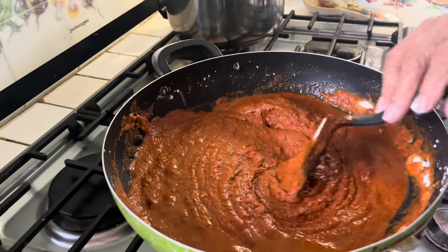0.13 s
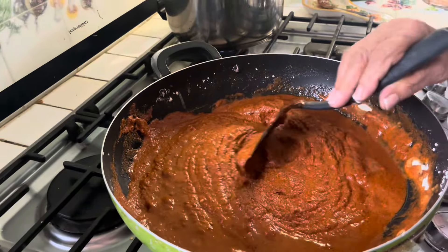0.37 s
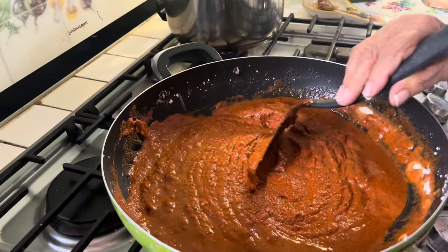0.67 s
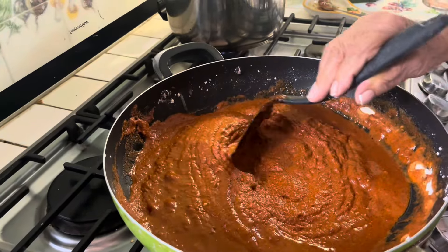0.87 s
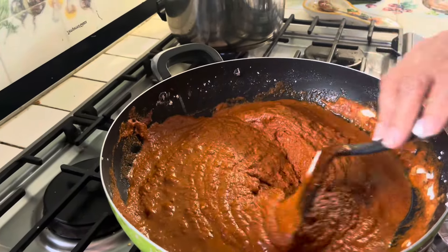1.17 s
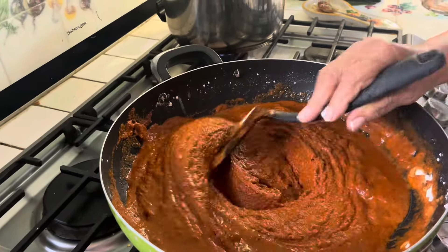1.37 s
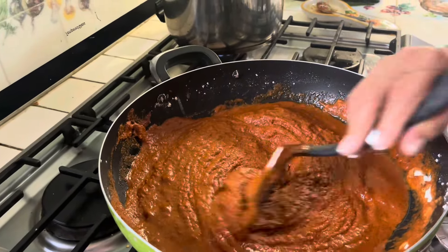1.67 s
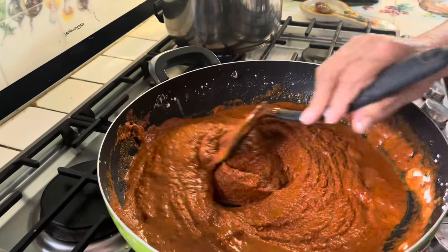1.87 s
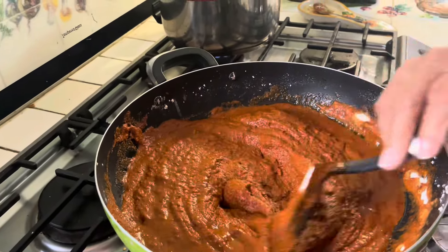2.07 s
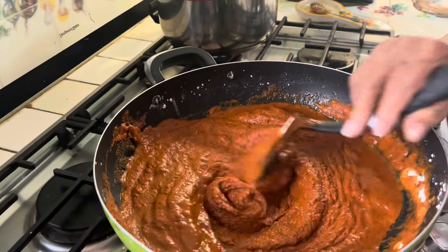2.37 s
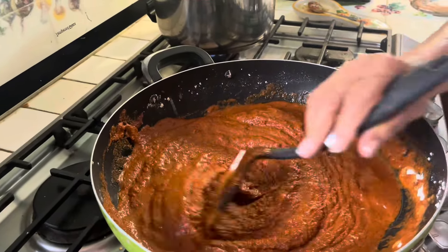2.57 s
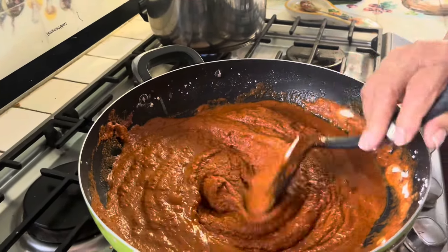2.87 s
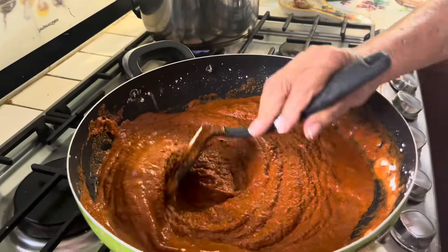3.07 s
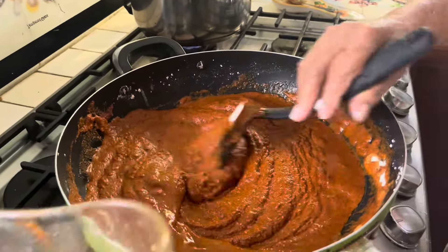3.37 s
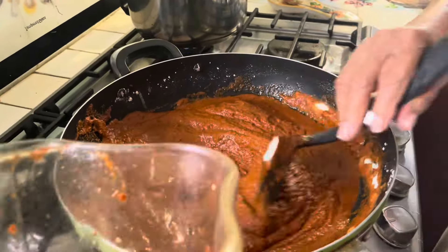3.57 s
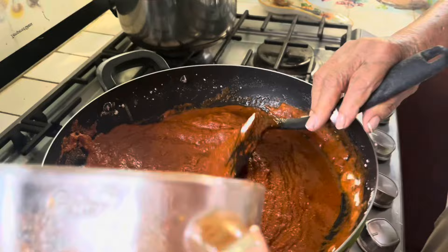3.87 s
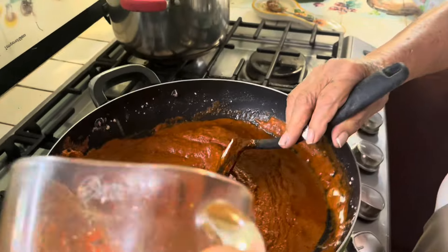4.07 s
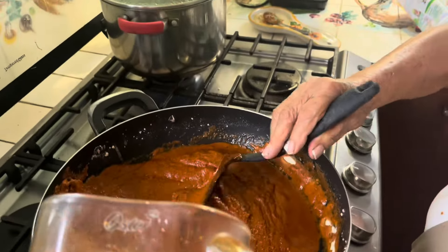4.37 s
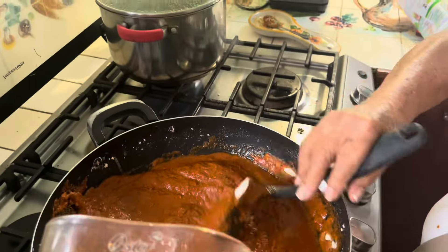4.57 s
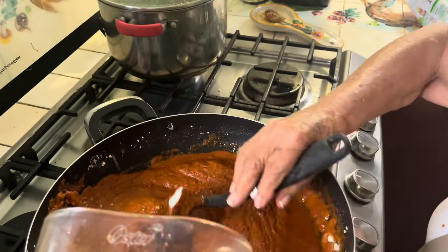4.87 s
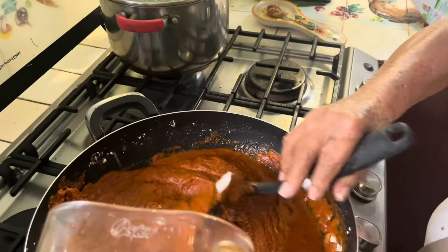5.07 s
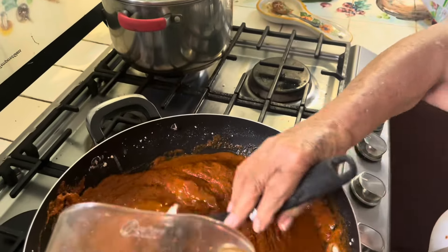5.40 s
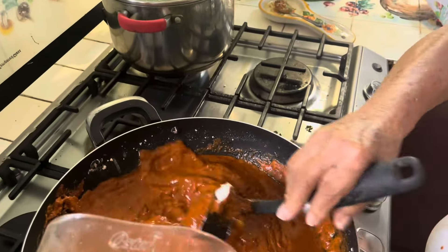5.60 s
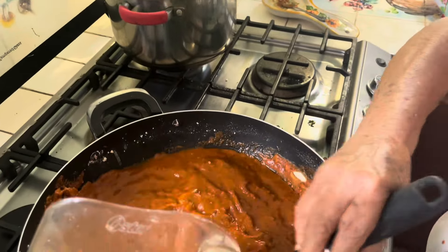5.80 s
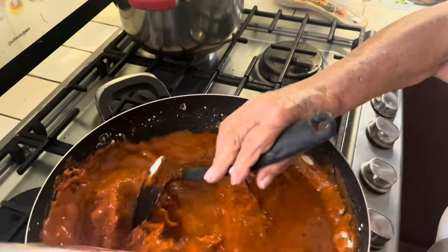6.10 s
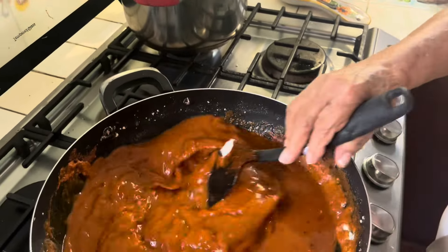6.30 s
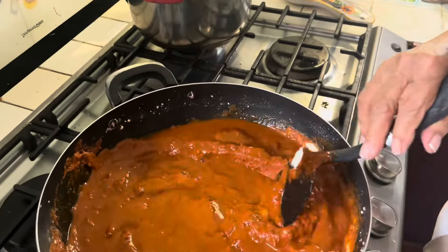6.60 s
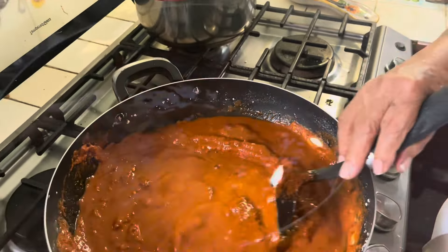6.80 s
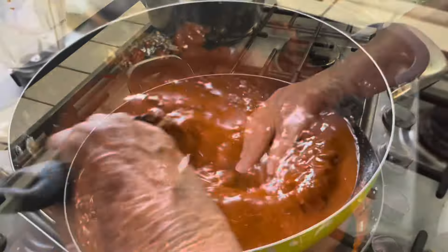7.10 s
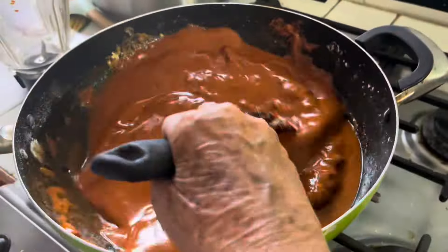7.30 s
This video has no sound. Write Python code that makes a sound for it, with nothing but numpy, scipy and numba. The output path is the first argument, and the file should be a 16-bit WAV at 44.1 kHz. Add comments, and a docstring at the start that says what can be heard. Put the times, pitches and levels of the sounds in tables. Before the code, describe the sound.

A close stereo perspective in a small tiled kitchen, with a low wavering hum, soft burner rush and fine simmering throughout. A spoon scrapes the pan floor at the start, around 0.5 and 1 s, in short gritty strokes. From 1.1 to 1.9 s the sauce squelches and smacks stickily, with rubbery groans near 1.5 s and a little sizzle. Firmer scrapes and wet slaps come at about 2.0 and 2.4 s, with small ticks; more scrapes at 2.9, 3.3 and 3.7 s, some with slaps and dull thuds. Low bumps cluster at 4.1-4.35 s. The loudest moment, 4.55-4.9 s, is a bright metallic clink and rattling knocks as the pan rocks on its grate. It then quietens; high wet crackles appear at 5.4-5.8 s. A strong slap lands at 6.14 s, followed by looser squelches, light scraping, a smaller slap at 6.6 s and a faint tick at 6.8 s.

```python
"""Stirring thick sauce on a gas hob

A tiled kitchen, two microphones close to the frying pan: a spoon scrapes the floor in strokes of stick-slip clicks.
The sauce squelches, plops and smacks as ringing cavities, and sizzles as filtered clicks; the pan floor groans.
Slaps, thuds and ticks are noise bursts that ring the pan; a few dull bumps cluster midway, then the pan rocks
on its grate. Under it all lie the burner's soft noise and a wavering hum of sines."""
import sys
import numpy as np
from scipy import signal
from scipy.fft import rfft, irfft, next_fast_len
from scipy.io import wavfile
from scipy.ndimage import uniform_filter1d
from numba import njit

SR = 44100
rng = np.random.default_rng(int(sys.argv[2]) if len(sys.argv) > 2 else 0)


def master_out(mix):
    """Clip the mix to full scale and print it as 16-bit PCM to the path in sys.argv[1]."""
    frames = np.transpose(np.atleast_2d(mix))
    ceiling = np.clip(frames, -1, 1)
    pcm = np.round(ceiling * 32767).astype(np.int16)
    wavfile.write(sys.argv[1], SR, pcm)


N = 328534
TIME = np.arange(N) / SR


def undb(db):
    """Decibels to gain."""
    return 10 ** (np.asarray(db) / 20)


def unit(x):
    """Scale to rms 1."""
    return x / np.sqrt(np.mean(x ** 2))


def even(x, size=2048):
    """Hold the level steady over a few hundredths of a second and keep the fine grain."""
    return x / np.sqrt(uniform_filter1d(x ** 2, size) + 1e-12)


def walk(rate):
    """Smooth chance of spread 1, drawn anew at this rate in Hz."""
    step = int(SR / rate)
    stairs = np.repeat(rng.standard_normal(N // step + 1), step)
    return unit(uniform_filter1d(stairs, step)[:N])


def colour(x, points, size=4096):
    """Causal minimum-phase filter through the given points of Hz and dB."""
    hz, db = np.transpose(points)
    grid = np.maximum(np.fft.rfftfreq(size, 1 / SR), 1)
    cepstrum = irfft(np.log(undb(np.interp(np.log(grid), np.log(hz), db))))
    # fold the cepstrum forward in time, so that nothing sounds before its cause
    cepstrum[1:size // 2] *= 2
    cepstrum[size // 2 + 1:] = 0
    return signal.fftconvolve(x, irfft(np.exp(rfft(cepstrum))))[:len(x)]


def roll_off(x, hz):
    """Treble falls away gently above the corner."""
    return signal.sosfilt(signal.butter(1, hz, fs=SR, output="sos"), x)


def fade(t, t60):
    """Exponential ring-down by 60 dB in t60."""
    return np.exp(-np.log(1000) * t / t60)


def swell(s, rise_s, fall_s, hold_s=0):
    """Exponential attack up to time s, hold, exponential release; rise and fall are time constants."""
    before = (s - TIME) / rise_s
    after = (TIME - s - hold_s) / fall_s
    return np.exp(-np.maximum(np.maximum(before, after), 0))


def add(track, s, x):
    """Mix a sound in at time s."""
    i = int(s * SR)
    track[i:i + len(x)] += x[:max(N - i, 0)]


def clicks(rate, spread_db):
    """Random tiny impulses of either sign, their sizes scattered exponentially in dB."""
    sizes = undb(spread_db * np.minimum(rng.exponential(size=N), 4))
    return (rng.random(N) < rate / SR) * sizes * rng.choice([-1, 1], N)


@njit
def resonance(x, hz, width_hz):
    """Band-pass whose centre moves."""
    out, band, low = np.empty(len(x)), 0., 0.
    for i in range(len(x)):
        g, k = np.tan(np.pi * hz[i] / SR), width_hz / hz[i]
        v = (band + g * (x[i] - low)) / (1 + g * (g + k))
        band, low, out[i] = 2 * v - band, low + 2 * g * v, k * v
    return out


def bubble(hz, cycles, glide, onset):
    """A cavity rings down by 60 dB in some cycles; its pitch slides by the share glide as it closes."""
    t = np.arange(int(cycles * SR / hz) + 4) / SR
    turns = hz * t
    tone = np.sin(2 * np.pi * turns * (1 + glide * turns / cycles / 2))
    ring = tone * fade(turns, cycles) * (1 - np.exp(-turns / onset))
    return ring / np.abs(ring).max()


def pockets(rows, cycles, glide, onset, trail_s, trail_db, scatter, splat_db, splat_t60, count=4):
    """Each opens with a rough splat and rings once; quieter ones follow it."""
    out, t = np.zeros(N), TIME[:SR // 4]
    for (s, db, hz), chance in zip(rows, rng.random((len(rows), count, 2))):
        spectrum = [(hz / 2, -16), (hz, 0), (2 * hz, -7), (10 * hz, -36), (100 * hz, -90)]
        splat = colour(rng.standard_normal(len(t)) * fade(t, splat_t60), spectrum)
        add(out, s, undb(db + splat_db) * splat / np.abs(splat).max())
        add(out, s, undb(db) * bubble(hz, cycles, glide, onset))
        for delay, pitch in chance:
            follower = bubble(hz * scatter ** (2 * pitch - 1), cycles, glide, onset)
            # the later, the quieter
            add(out, s + trail_s * delay, undb(db + trail_db * (2.0 + delay)) * follower)
    return out


# The pan on its grate. Each row: mode in Hz, level in dB before chance, 60 dB ring time in seconds before damping.
PAN_MODES = [(242, -16, .5), (317, -10, .45), (391, -11, .25), (517, -13, .3), (579, -4, .12),
             (898, -13, .18), (1179, 3, .2), (1205, -4, .13), (1300, 0, .05), (1529, -12, .16),
             (1823, -14, .2), (2105, -16, .2), (2331, -15, .2), (3160, -13, .25), (3418, -18, .2),
             (4064, -16, .18), (4237, -13, .2), (4468, -11, .22), (4861, -11, .12), (6266, -21, .2),
             (7440, -19, .2), (10240, -21, .2), (11175, -12, .25), (12520, -23, .2)]


def pan_ring(t, damping):
    """The modes of the pan, a little different at each spot; sauce and spoon damp them."""
    chance = rng.standard_normal((len(PAN_MODES), 2))
    return sum(undb(db + 2 * size) * np.sin(2 * np.pi * (hz * t + phase)) * fade(t, t60 / damping)
               for (hz, db, t60), (size, phase) in zip(PAN_MODES, chance))


def through_pan(x, ring_db):
    """Whatever happens in the pan sets its modes ringing."""
    ring = pan_ring(TIME[:SR // 2], damping=1)
    return x + undb(ring_db) * signal.fftconvolve(x, ring / np.abs(rfft(ring)).max())[:N]


def blows(rows, spectrum, crack_t60, tail_db, tail_t60, ring_db, damping):
    """A contact crack, a rattle and the modes of the pan; each contact has its own treble corner."""
    out, t = np.zeros(N), np.arange(SR * 3 // 4) / SR
    for s, db, corner_hz in rows:
        envelope = fade(t, crack_t60) + undb(tail_db) * fade(t, tail_t60)
        crack = colour(rng.standard_normal(len(t)) * envelope, spectrum)
        hit = roll_off(crack / np.abs(crack).max() + undb(ring_db) * pan_ring(t, damping), corner_hz)
        add(out, s, undb(db) * hit / np.abs(hit).max())
    return out


def place(x, room_db, pan_db=0, lag_ms=-.065):
    """Two close microphones, the left hearing it lag_ms later (sooner if negative), then hob and tiled walls."""
    size = 2 * next_fast_len(N // 2 + 1, True)
    hz, t = np.fft.rfftfreq(size, 1 / SR), TIME[:SR // 2]
    left = irfft(rfft(x, size) * np.exp(-2j * np.pi * hz * lag_ms / 1000))[:N]
    # a dense early cluster and a longer, quieter tail
    envelope = (fade(t, 0.031) + undb(-17.5) * fade(t, 0.44)) * (1 - np.exp(-t / 0.0024))
    mid_colour = [(80, -1.5), (400, 3.5), (4500, 5.0), (8500, -13.0)]
    # long waves reach both microphones alike
    side_colour = [(100, -19.0), (300, -3.0), (600, 5.0), (1500, 4.0), (4500, 3.5), (8500, -83)]
    echoes = [colour(unit(rng.standard_normal(len(t))) * envelope, points) for points in (mid_colour, side_colour)]
    mid, side = (signal.fftconvolve(x, echo)[:N] / np.linalg.norm(envelope) for echo in echoes)
    heard = np.array([left, x]) + undb(room_db) * np.array([mid + side, mid - side])
    return heard * undb(np.array([[pan_db], [-pan_db]]) / 2)


def roaming(x, ring_db, room_db, pan_db, count=4):
    """The spoon wanders between spots in the pan, each with its own ring and reflections."""
    nearness = np.array([np.exp(2 * walk(7)) for _ in range(count)])
    shares = nearness / nearness.sum(axis=0)
    return sum(place(through_pan(x * share, ring_db), room_db, pan_db) for share in shares)


# Colour of the burner's rush in the kitchen. Each row: frequency in Hz, relative level in dB.
RUSH_COLOUR = [(22, -13.5), (40, -0.5), (58, 5), (90, -2.5), (190, -8), (300, -7.5), (520, -16.5),
               (1000, -17), (2000, -23), (4400, -24), (7000, -29), (15000, -107)]
# Motor and mains hum. Each row: frequency in Hz, peak level in dB about which it wavers.
HUM_TONES = [(51, -56), (60, -56), (76, -72), (120, -47), (160, -57), (239, -53)]
HUM_WAVER_DB = 2.5


def kitchen():
    """The burner's rush is noise, alike in the bass at both microphones; the hum is a set of wavering sines."""
    mid, side = (colour(rng.standard_normal(N), RUSH_COLOUR) for _ in range(2))
    side = colour(unit(side), [(40, -23), (130, -10.5), (300, -9.5), (600, 3.0), (10000, -1.5)])
    rush = undb(-45.0) * (unit(mid) + side * np.array([[1], [-1]])) * undb(.5 * walk(3.74))
    hum = sum(undb(db + HUM_WAVER_DB * walk(8)) * np.sin(2 * np.pi * hz * TIME + .5 * walk(4))
              for hz, db in HUM_TONES)
    return (rush + hum) * undb(np.array([[.7], [-.7]]))


# Strokes of the spoon over the pan floor. Each row: hardest push in seconds, level in dB, bite of the edge in dB
# relative to the push, length in seconds (rise plus fall time constant), central pitch of the edge in Hz.
SPOON_STROKES = [(0.031, -36.5, -3, 0.13, 1750), (0.527, -45, -7, 0.19, 1700),
                 (0.983, -44.5, -5, 0.19, 1800), (1.385, -48.5, 1.5, 0.28, 1890),
                 (1.826, -44.5, -5.5, 0.33, 2280), (2.003, -33.5, -2.5, 0.085, 2090),
                 (2.42, -33.5, -1.5, 0.085, 1590), (2.866, -35.5, -2, 0.091, 2800),
                 (3.282, -33.5, -1.5, 0.058, 1800), (3.36, -41, -20, 0.056, 1300),
                 (3.708, -33.5, -1.5, 0.039, 2070), (3.778, -36, -8, 0.087, 2500),
                 (4.149, -49, 2.5, 0.094, 1750), (4.37, -43, -5.5, 0.12, 1900),
                 (5.527, -42.5, -6, 0.16, 2130), (6.093, -47, -10, 0.37, 1900),
                 (6.32, -48.5, -3, 0.14, 2200), (6.595, -41, -6, 0.036, 1600),
                 (6.684, -44.5, -10.5, 0.43, 1700)]
STROKE_RISE_SHARE = 0.51  # of its length; the rest is the fall
DRAG_DB, DRAG_BITE_DB = -60, -18  # sauce that clings to the spoon between strokes
WAKE_DB, WAKE_S = -15, 0.14  # sauce flowing back round each stroke, relative to the stroke


def stirring():
    """How hard the spoon pushes and how much its edge bites: drag, strokes and wakes add as powers."""
    push, bite = undb(DRAG_DB) ** 2, undb(DRAG_DB + DRAG_BITE_DB) ** 2
    for s, db, bite_db, length_s, _ in SPOON_STROKES:
        stroke = undb(db) * swell(s, STROKE_RISE_SHARE * length_s, (1 - STROKE_RISE_SHARE) * length_s)
        wake = undb(db + WAKE_DB) * swell(s, WAKE_S, WAKE_S)
        push = push + stroke ** 2 + wake ** 2
        bite = bite + (stroke * undb(bite_db)) ** 2 + (wake * undb(DRAG_BITE_DB)) ** 2
    return np.sqrt(push), np.sqrt(bite)


# Colour of the scrape's body. Each row: frequency in Hz, relative level in dB.
BODY_COLOUR = [(150, -13), (315, 0), (420, -2), (600, 3), (850, -1), (1120, -4), (1600, -14.5),
               (3000, -46.5)]
# Colour that feeds the spoon's edge. Each row: frequency in Hz, relative level in dB.
EDGE_COLOUR = [(700, -17), (1250, 13.5), (1600, 17), (2300, 13.5), (3000, 11), (5000, -20)]
SLIPS_PER_S, SLIP_SPREAD_DB, SLIP_FLUTTER_DB = 900, 3.2, 2.15
EDGE_WIDTH_HZ, EDGE_DRIFT = 760.0, 0.23  # the resonance of the spoon's edge, and the share by which it wanders


def scraping(push, bite):
    """The spoon sticks and slips over the pan floor; its resonant edge is pitched anew in each stroke."""
    slips = clicks(SLIPS_PER_S, SLIP_SPREAD_DB) * undb(SLIP_FLUTTER_DB * walk(70))
    stroke_s = [row[0] for row in SPOON_STROKES]
    stroke_hz = [row[4] for row in SPOON_STROKES]
    edge_hz = np.interp(TIME, stroke_s, stroke_hz) * np.exp(EDGE_DRIFT * walk(25))
    edge = resonance(colour(slips, EDGE_COLOUR), edge_hz, EDGE_WIDTH_HZ)
    return push * even(colour(slips, BODY_COLOUR)) + bite * even(edge)


# The spoon turns the sauce over, which squelches and sizzles on the bared metal.
# Each row: start of the hold in seconds, hold in seconds, squelch level in dB, sizzle level in dB.
SAUCE_FOLDS = [(1.18, 0.29, -47, -44), (1.493, 0.15, -47, -49.5), (1.736, 0.27, -43, -44.5),
               (2.158, 0.12, -44.5, -51), (2.344, 0.023, -38, -47.5), (2.6, 0.31, -52.5, -55.5),
               (3.076, 0.63, -61, -54), (3.51, 0.23, -55, -46.5), (3.99, 0.3, -56, -79),
               (5.142, 0.14, -56, -58.5), (5.422, 0.14, -49.5, -52.5), (5.556, 0.51, -55.5, -59),
               (6.117, 0.16, -50, -50), (6.382, 0.31, -54, -58.5), (6.77, 0.11, -55, -54),
               (6.967, 0.45, -66, -63)]
FOLD_ATTACK_S, FOLD_RELEASE_S = 0.061, 0.061


def folding():
    """How much sauce is tearing open and how much hot metal lies bare, folds adding as powers."""
    return np.sqrt(sum(np.outer(undb([squelch_db, sizzle_db]),
                                swell(s, FOLD_ATTACK_S, FOLD_RELEASE_S, hold_s)) ** 2
                       for s, hold_s, squelch_db, sizzle_db in SAUCE_FOLDS))


SQUELCH_PER_BITE_DB, SQUELCH_REST_DB = -16, -71.5  # squelch behind the spoon's edge; that of sauce left alone
SQUELCH_CYCLES, SQUELCH_CLUMP_DB = 9, 3.2  # shortest ring; spread of the clumping


def squelching(tear, bite, count=5000):
    """Tiny cavities tear open in clumps in each fold and behind the spoon's edge: some crackle, some ring."""
    out = np.zeros(N)
    pitches = np.clip(rng.standard_normal(count), -2, 2)
    for (when, length, size), pitch in zip(rng.random((count, 3)), pitches):
        ring = bubble(2950 * 1.42 ** pitch, cycles=SQUELCH_CYCLES * 7.3 ** length, glide=0.38, onset=0.2)
        add(out, when * N / SR, ring * undb(-3.8 * np.log(max(size, .02))))
    clumps = undb(SQUELCH_CLUMP_DB * walk(55))
    behind_edge = bite * undb(SQUELCH_PER_BITE_DB)
    return unit(out * clumps) * np.sqrt(tear ** 2 + behind_edge ** 2 + undb(SQUELCH_REST_DB) ** 2)


# Colour of the sizzle on bared metal. Each row: frequency in Hz, relative level in dB.
SIZZLE_COLOUR = [(3000, -7.5), (5000, 12.5), (6800, 20.5), (9500, 6), (12000, 15.5), (15500, -10)]
# Colour of the steady simmer. Each row: frequency in Hz, relative level in dB.
SIMMER_COLOUR = [(1500, 1), (3000, 7.5), (5000, 1.5), (7000, -39), (10000, 10), (13000, -1.5), (15500, -18)]
# Single droplets bursting on hot metal. Each row: start in seconds, peak level in dB before the room.
DROPLETS = [(0.312, -36), (0.444, -39), (2.278, -36), (5.27, -39), (6.128, -31), (6.778, -28.5)]
# Colour of a droplet's burst. Each row: frequency in Hz, relative level in dB.
DROPLET_COLOUR = [(2000, -39), (7000, -6), (12500, 7), (15500, -7)]
DROPLET_T60_S, SIZZLE_FLUTTER_DB = 0.016, 2.6


def sizzling(bare):
    """The sauce simmers steadily in fine clicks and spits where a fold bares the hot metal."""
    spits = clicks(rate=1100, spread_db=3.5) * undb(SIZZLE_FLUTTER_DB * walk(27.13))
    simmer = unit(colour(clicks(rate=5800, spread_db=-1.0), SIMMER_COLOUR))
    out = unit(colour(spits, SIZZLE_COLOUR)) * bare + undb(-59.0) * simmer
    t = TIME[:SR // 20]
    for s, db in DROPLETS:
        burst = colour(rng.standard_normal(len(t)) * fade(t, DROPLET_T60_S), DROPLET_COLOUR)
        add(out, s, undb(db) * burst / np.abs(burst).max())
    return out


# The spoon's back slips over the pan floor and makes it groan.
# Each row: height of the swell in seconds, level in dB before roughness, central pitch in Hz,
# rise and fall time constant in seconds.
FLOOR_GROANS = [(0.05, -48, 318, 0.044), (1.412, -36, 515, 0.018), (1.49, -35, 518, 0.017),
                (1.545, -32, 512, 0.02), (1.585, -34, 505, .012), (1.64, -43, 513, .022),
                (1.71, -38, 503, .018), (1.79, -49, 525, 0.045), (2.03, -36, 317, 0.053),
                (2.025, -34, 560, 0.024), (2.359, -35, 563, 0.015), (2.505, -37, 576, 0.016),
                (2.77, -46, 560, 0.022), (2.86, -37, 316, 0.075), (2.91, -38, 590, 0.02),
                (3.06, -43, 650, .08)]
GROAN_ROUGH_DB, GROAN_WAVER = 4, .03  # spread of the level; share by which the pitch wavers, at two speeds


def groaning():
    """Uneven slips feed sauce-damped modes of the pan floor, which waver as the spoon moves."""
    rough = even(undb(GROAN_ROUGH_DB * walk(110)))
    wavering = np.cumsum(1 + GROAN_WAVER * (walk(30) + walk(140))) / SR
    return rough * sum(undb(db) * swell(s, length_s, length_s) * np.sin(2 * np.pi * hz * wavering)
                       for s, db, hz, length_s in FLOOR_GROANS)


# Air pockets closing in the sauce. Each row: start in seconds, peak of the ring in dB before pan and room,
# starting pitch in Hz.
AIR_POCKETS = [(0.312, -36.5, 409), (0.356, -38.5, 279), (1.25, -37, 1010), (1.262, -33.5, 1240),
               (1.364, -34, 1170), (1.399, -37, 970), (2.465, -27, 680), (3.277, -28.5, 1020),
               (3.548, -36.5, 1060), (6.138, -35, 1030), (6.374, -37, 1060), (6.567, -38, 580)]


def plopping():
    """Closing air pockets ring briefly with a slight rise in pitch."""
    return pockets(AIR_POCKETS, cycles=11.0, glide=0.038, onset=0.3, trail_s=0.038, trail_db=-7.0,
                   scatter=1.24, splat_db=-11.5, splat_t60=0.05)


# Spoon slapping the pan through the sauce. Each row: start in seconds, peak in dB before the room,
# treble corner in Hz.
SPOON_SLAPS = [(0.312, -34.5, 2500), (1.399, -30, 2500), (1.969, -19.5, 2200), (2.353, -22, 3500),
               (2.413, -18.5, 1500), (2.428, -18, 1500), (2.657, -33, 3000), (3.279, -30, 1480),
               (3.688, -22, 2520), (3.768, -24, 700), (3.921, -35, 700), (6.14, -16.5, 4000),
               (6.57, -27, 1200)]
# Colour of a slap's crack. Each row: frequency in Hz, relative level in dB.
SLAP_COLOUR = [(150, -14), (500, -13), (1100, 11), (1900, 8.5), (3500, -6.5), (10000, -15)]


def slapping():
    """A short crack through the sauce, which damps the pan heavily."""
    return blows(SPOON_SLAPS, SLAP_COLOUR, crack_t60=0.0087, tail_db=-38, tail_t60=0.019, ring_db=-33, damping=3.9)


# The loudest sauce films snapping off the spoon. Each row: start in seconds, peak of the ring in dB before
# the room, starting pitch in Hz.
FILM_SMACKS = [(1.084, -26, 1160), (1.1653, -34, 2850), (1.1854, -22.5, 3100), (1.1936, -22.5, 2870),
               (1.208, -30, 1840), (1.229, -33, 3700), (1.2356, -27, 2450), (1.294, -25, 3040),
               (1.3488, -26.5, 2700), (1.3985, -28, 2290), (1.544, -28, 3030), (1.6128, -31, 3200),
               (1.6352, -29.5, 2420), (1.712, -16.5, 6730), (1.7385, -37, 2420), (1.755, -24.5, 2460),
               (1.792, -31, 3090), (1.8163, -26, 2350), (1.9196, -33, 1780), (1.9375, -31, 2630),
               (1.9689, -31, 1570), (2.3125, -24, 3300), (2.354, -26.5, 1780), (3.2524, -28.5, 1634),
               (3.27, -30, 1640), (5.3657, -27.5, 6150), (5.4235, -32.5, 2290), (5.427, -22.5, 5650),
               (5.4685, -22.5, 5700), (5.5034, -40, 2000), (5.6231, -32.5, 4130), (5.7024, -34.5, 2860),
               (5.8182, -33.5, 4790), (6.112, -31, 1960), (6.3639, -38, 2250), (6.4642, -41, 3000)]


def smacking():
    """Snapping films open small cavities that ring high and rise slightly."""
    return pockets(FILM_SMACKS, cycles=31, glide=0.046, onset=1.0, trail_s=0.021, trail_db=-7.5,
                   scatter=1.11, splat_db=-9, splat_t60=0.0095)


# Dull low bumps. Each row: start in seconds, peak of the ring in dB before pan and room, # starting pitch in
# Hz.
DULL_BUMPS = [(1.524, -30.5, 129.5), (4.114, -28.5, 133), (4.124, -17, 101.6), (4.165, -38, 107),
              (4.236, -25, 98), (4.324, -22.5, 102.4), (4.596, -30.5, 79.5)]


def bumping():
    """A low ring that sinks slightly, with a long rough splat."""
    return pockets(DULL_BUMPS, cycles=24.4, glide=-0.034, onset=0.34, trail_s=0.068, trail_db=-21,
                   scatter=1.65, splat_db=-6.0, splat_t60=0.6)


# The spoon knocks on the pan floor, muffled by sauce. Each row: start in seconds, peak in dB before pan and room,
# pitch of the body in Hz.
FLOOR_THUDS = [(1.524, -27.5, 504), (1.697, -31, 470), (2.743, -30.5, 485), (3.16, -36.5, 600),
               (3.546, -31.5, 506), (3.768, -24.5, 550), (3.921, -22, 380), (4.116, -28, 230),
               (4.253, -27.5, 472), (4.331, -30.5, 517)]
# Colour of a thud. Each row: multiple of the body's pitch, relative level in dB.
THUD_COLOUR = [(.2, -25), (.65, -10), (1, 0.5), (1.35, -10), (2.2, -19.5), (4, -36), (25, -78)]
THUD_RATTLE_DB, THUD_T60_S = -25, 0.11


def thudding():
    """One blunt push on the pan floor, then a short shudder of pan and sauce."""
    out, t = np.zeros(N), TIME[:SR // 4]
    for s, db, hz in FLOOR_THUDS:
        shudder = rng.standard_normal(len(t)) * fade(t, THUD_T60_S)
        contact = (t == 0) + undb(THUD_RATTLE_DB) * shudder
        body = colour(contact, [(hz * multiple, band_db) for multiple, band_db in THUD_COLOUR])
        add(out, s, undb(db) * body / np.abs(body).max())
    return out


# Hard ticks on the rim and grate. Each row: start in seconds, peak in dB before the room, treble corner in Hz.
RIM_CLINKS = [(2.274, -24, 7500), (2.353, -20, 4500), (2.656, -27.5, 7500), (3.081, -21.5, 7450),
              (3.092, -29, 7500), (4.355, -18, 7540), (4.579, -10.5, 7550), (4.614, -14.5, 9050),
              (4.713, -26.5, 9000), (6.838, -25.5, 7500)]
# Colour of a tick's crack. Each row: frequency in Hz, relative level in dB.
CLINK_COLOUR = [(500, -1), (2000, -14), (4200, 3.5), (6000, 6), (11500, 7.5), (15000, -10.5)]


def clinking():
    """A hard, bright crack with a faint, lightly damped ring of the pan."""
    return blows(RIM_CLINKS, CLINK_COLOUR, crack_t60=.016, tail_db=-30.5, tail_t60=0.51, ring_db=-51.0, damping=0.78)


# Pan rocking on the grate. Each row: start in seconds, peak in dB before the room, treble corner in Hz.
GRATE_KNOCKS = [(4.568, -14.5, 2500), (4.571, -11, 2840), (4.606, -24, 1100), (4.712, -14.5, 1300),
                (4.733, -22.5, 900), (4.831, -21.5, 1090), (4.887, -27.5, 1300)]
# Colour of a knock's crack. Each row: frequency in Hz, relative level in dB.
KNOCK_COLOUR = [(100, 0), (200, 4.5), (320, 11.5), (430, 9), (570, 11.5), (750, 0), (1050, 0), (1300, 3.5),
                (1600, -9), (2100, -4), (3500, -1), (7000, -10.5), (14000, -15.5)]


def knocking():
    """The rocking pan strikes its grate, rattles and rings."""
    return blows(GRATE_KNOCKS, KNOCK_COLOUR, crack_t60=0.0084, tail_db=-20.5, tail_t60=0.37,
                 ring_db=-22.5, damping=1.45)


def scene():
    """Everything happens in or by the pan, mostly a little off centre, over the kitchen's rush and hum."""
    push, bite = stirring()
    tear, bare = folding()
    return (kitchen()
            + roaming(scraping(push, bite), ring_db=-21.0, room_db=-2.5, pan_db=-0.5)
            + place(squelching(tear, bite) + smacking(), room_db=-5, pan_db=2.0)
            + place(sizzling(bare), room_db=0.0)
            + place(groaning(), room_db=-11, pan_db=8.0)
            + place(through_pan(plopping(), ring_db=13.5), room_db=0.0, pan_db=2.0)
            + place(slapping(), room_db=-7.5, pan_db=-4.0)
            + place(through_pan(bumping(), ring_db=12), room_db=-10.5, pan_db=4.0)
            + place(through_pan(thudding(), ring_db=8), room_db=-1.5, pan_db=1.5)
            + place(clinking(), room_db=0.0, pan_db=2.3)
            + place(knocking(), room_db=-5.5, pan_db=1.0, lag_ms=0))


TOP_HZ = 15000


def record(dry):
    """The recorder cuts the top steeply."""
    return signal.sosfilt(signal.ellip(8, .2, 70, TOP_HZ, fs=SR, output="sos"), dry)


dry = scene()
out = record(dry)
master_out(out)
```